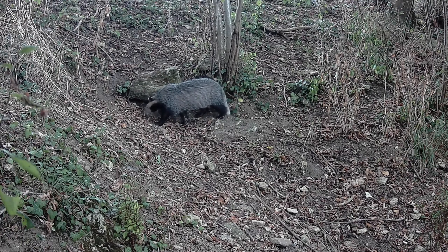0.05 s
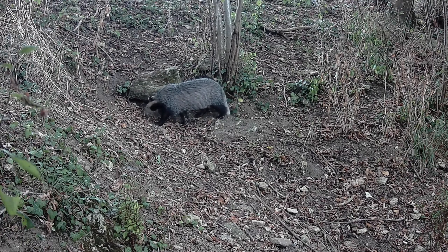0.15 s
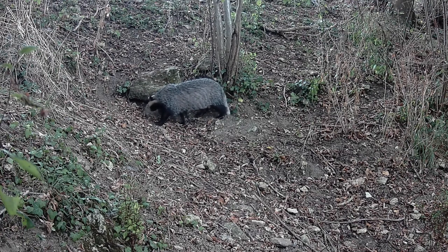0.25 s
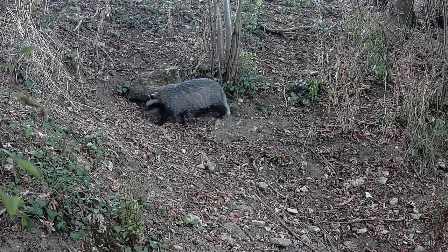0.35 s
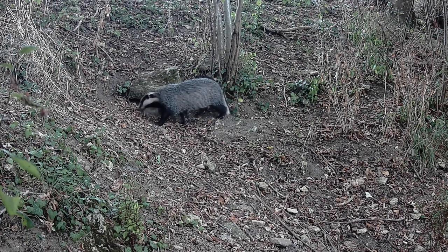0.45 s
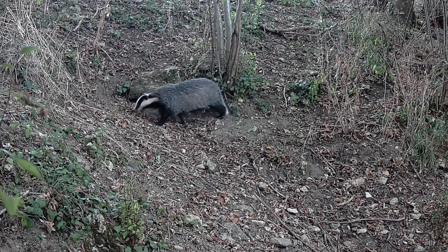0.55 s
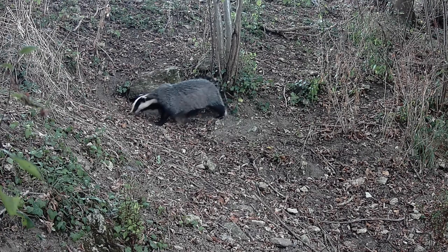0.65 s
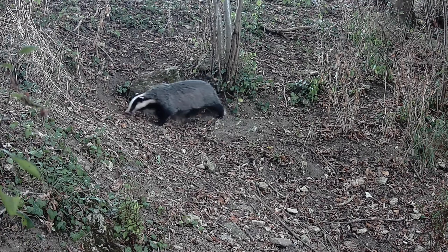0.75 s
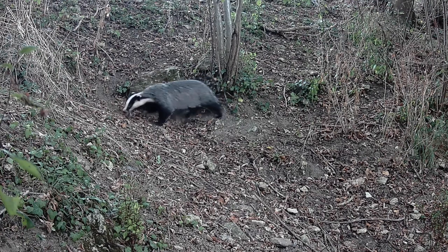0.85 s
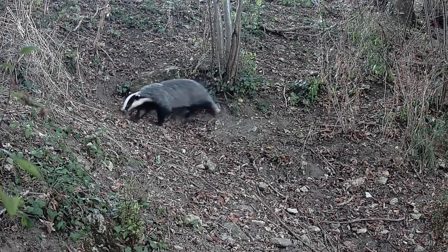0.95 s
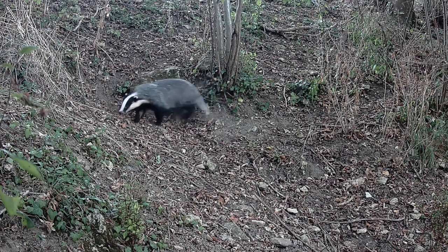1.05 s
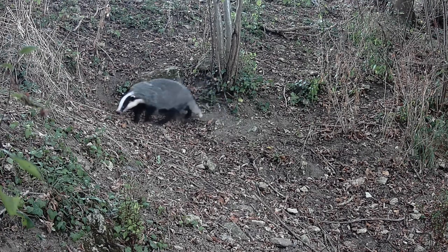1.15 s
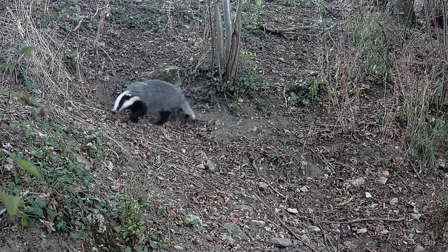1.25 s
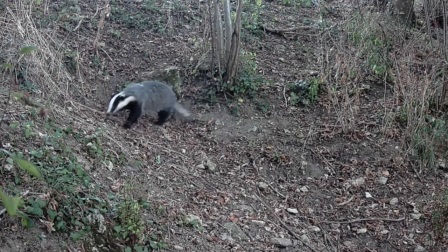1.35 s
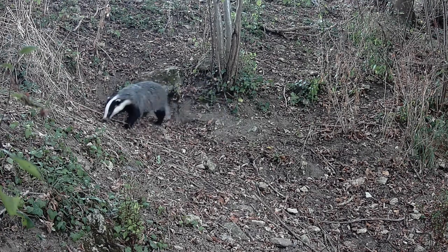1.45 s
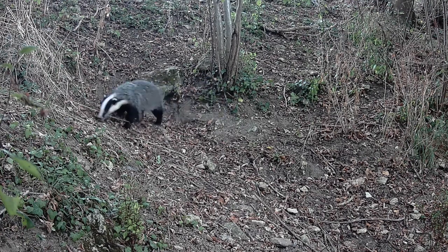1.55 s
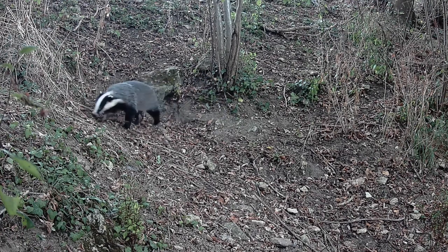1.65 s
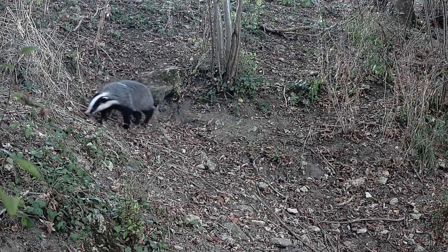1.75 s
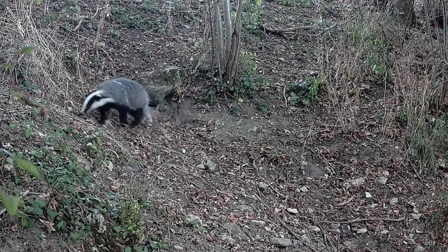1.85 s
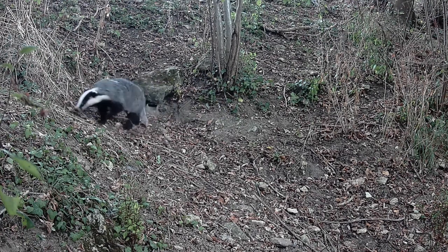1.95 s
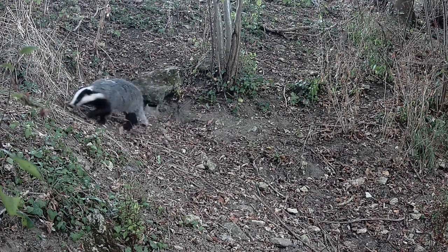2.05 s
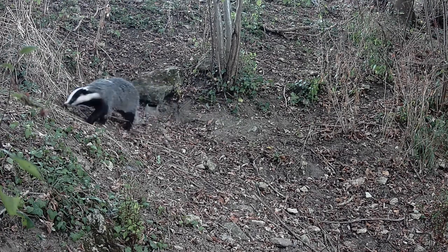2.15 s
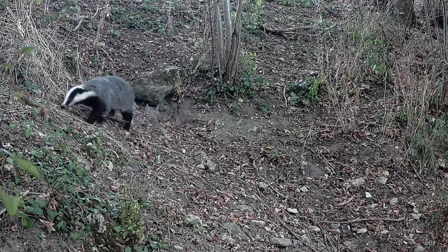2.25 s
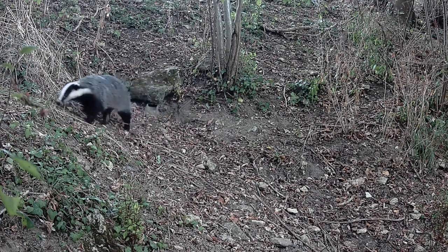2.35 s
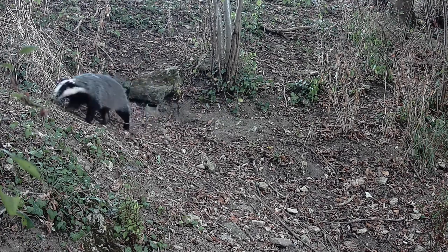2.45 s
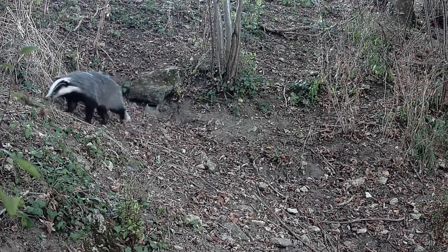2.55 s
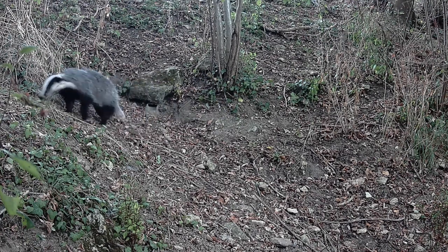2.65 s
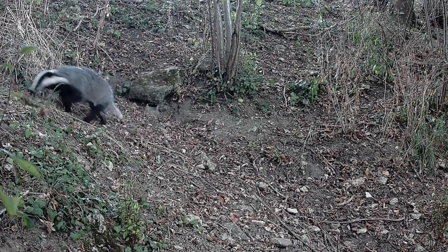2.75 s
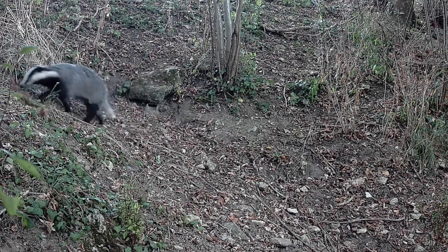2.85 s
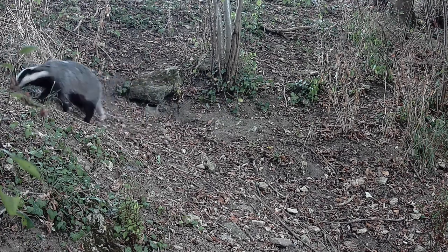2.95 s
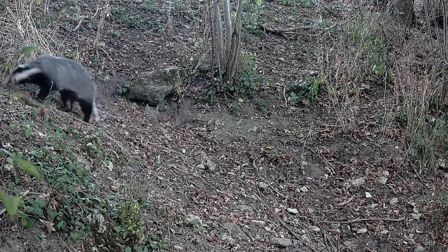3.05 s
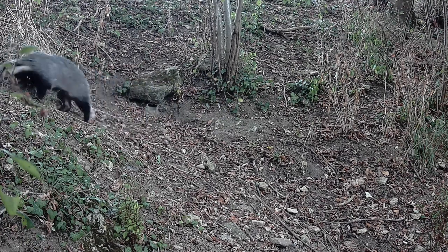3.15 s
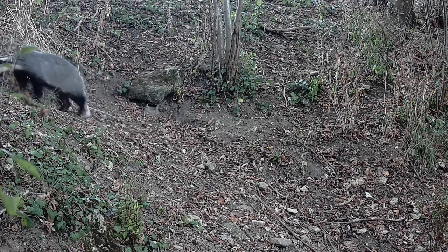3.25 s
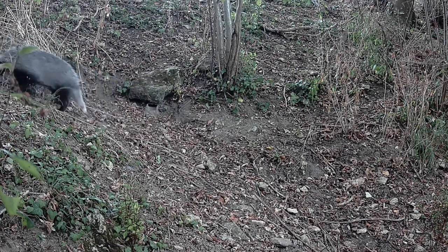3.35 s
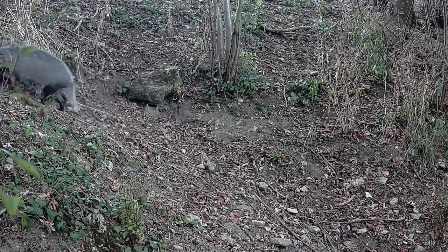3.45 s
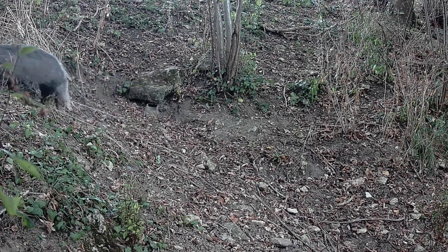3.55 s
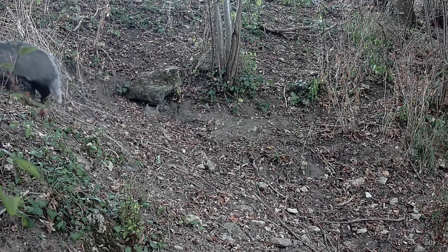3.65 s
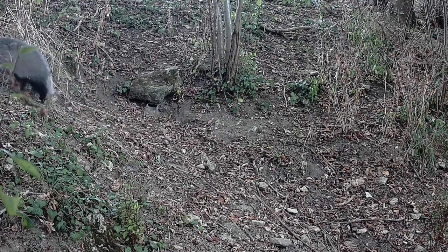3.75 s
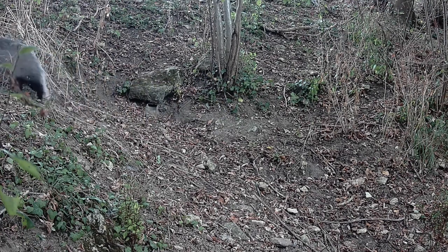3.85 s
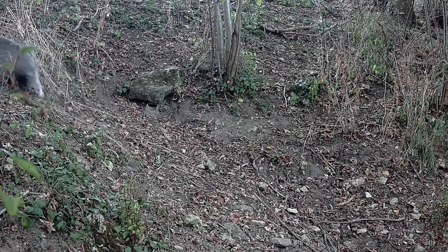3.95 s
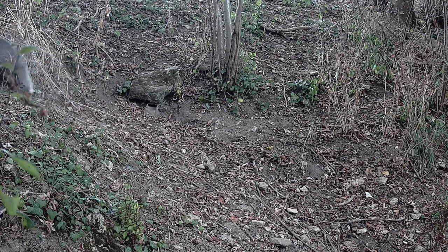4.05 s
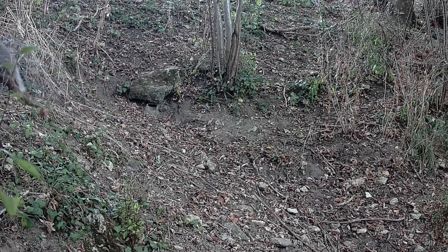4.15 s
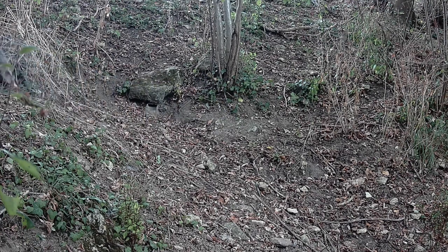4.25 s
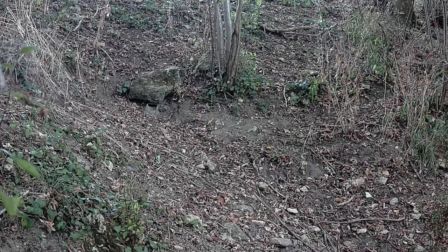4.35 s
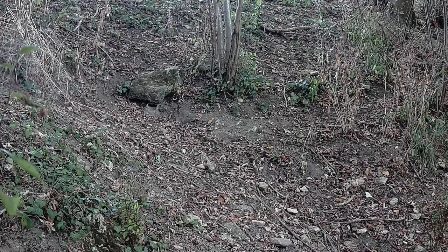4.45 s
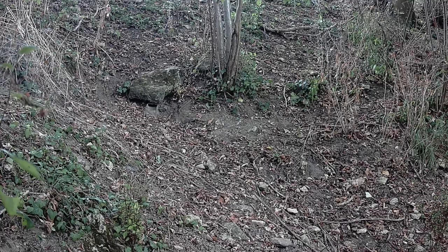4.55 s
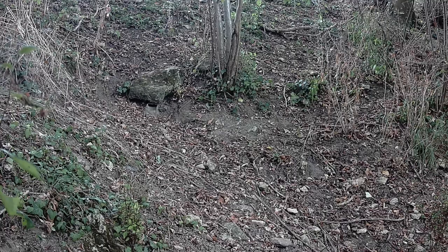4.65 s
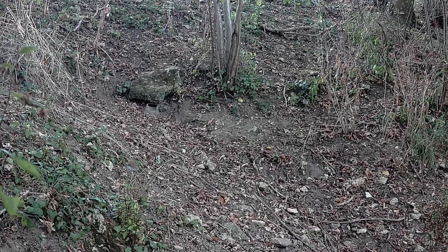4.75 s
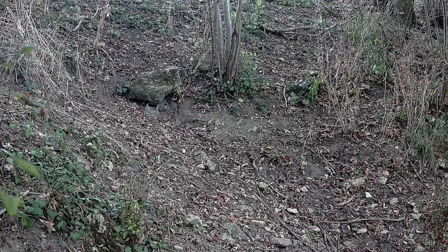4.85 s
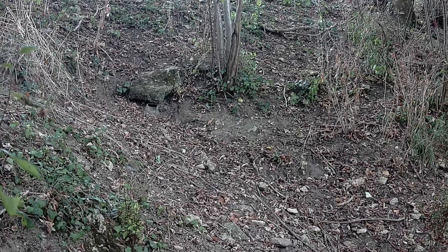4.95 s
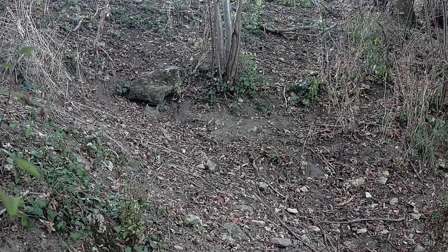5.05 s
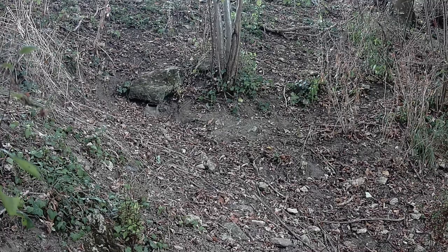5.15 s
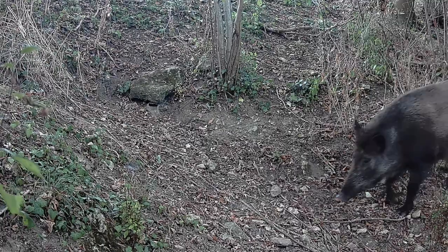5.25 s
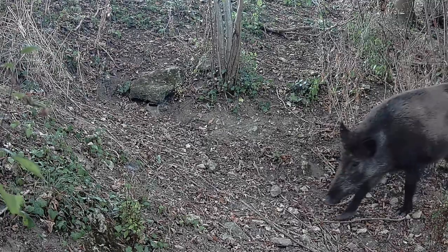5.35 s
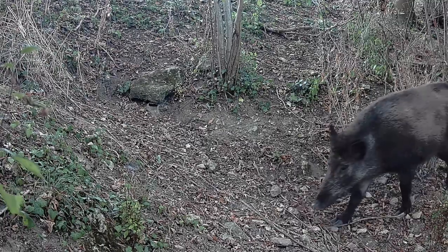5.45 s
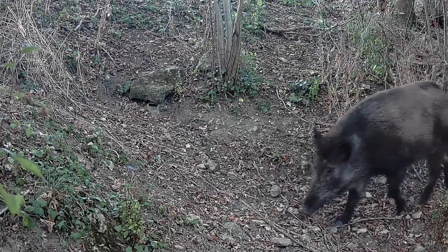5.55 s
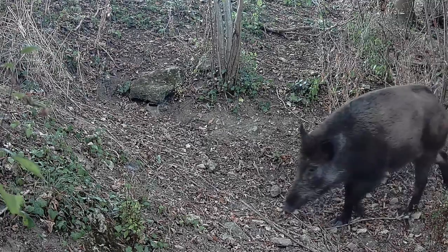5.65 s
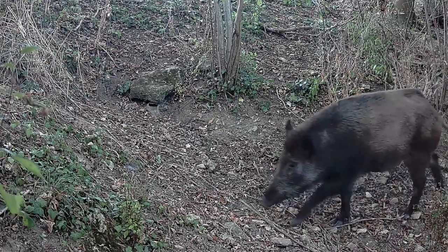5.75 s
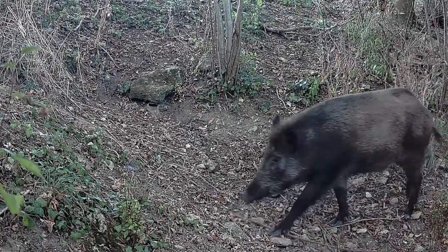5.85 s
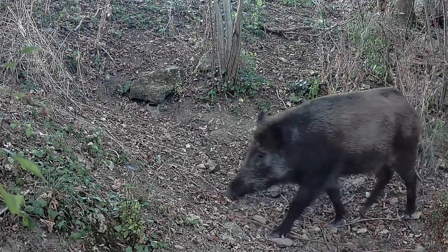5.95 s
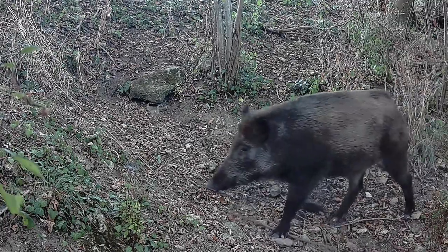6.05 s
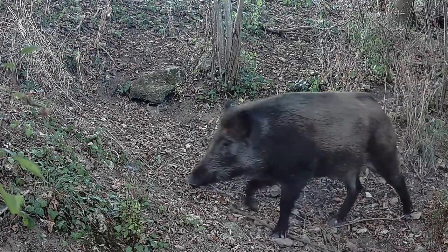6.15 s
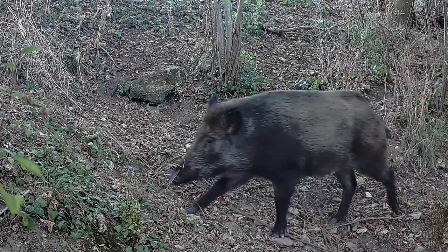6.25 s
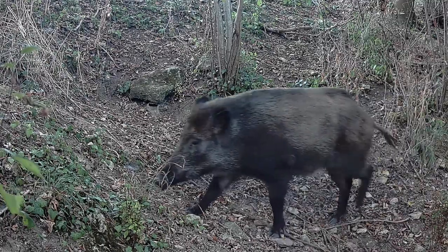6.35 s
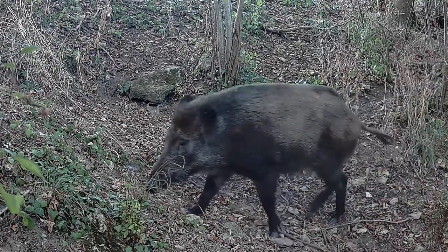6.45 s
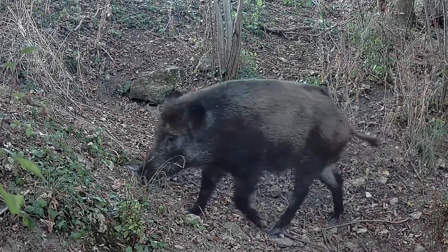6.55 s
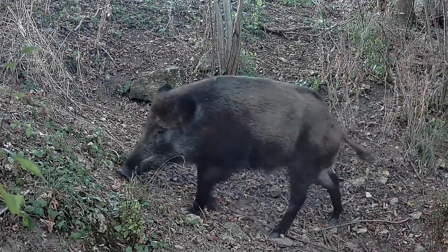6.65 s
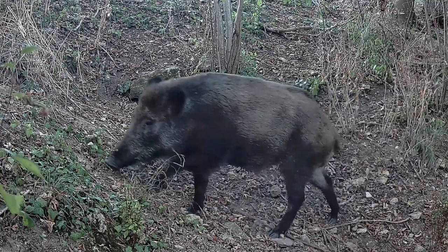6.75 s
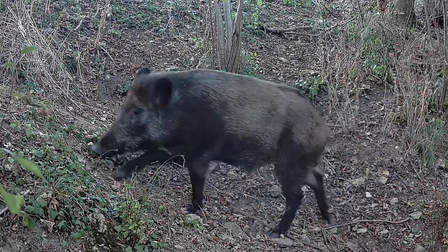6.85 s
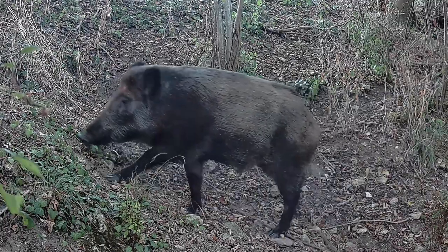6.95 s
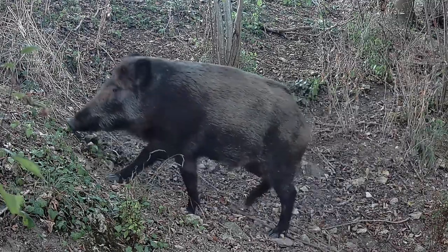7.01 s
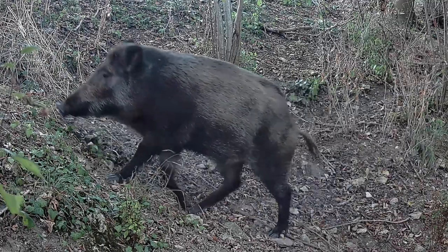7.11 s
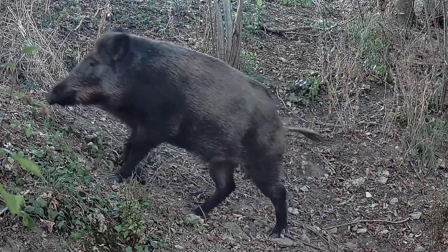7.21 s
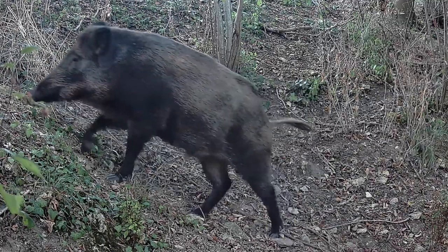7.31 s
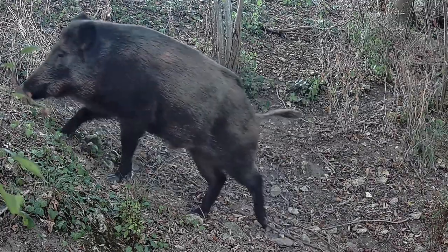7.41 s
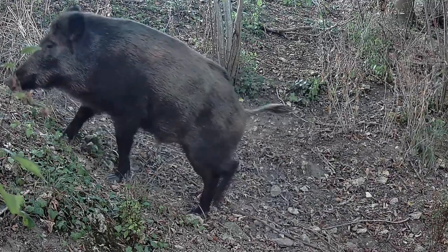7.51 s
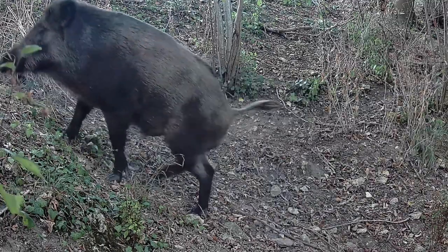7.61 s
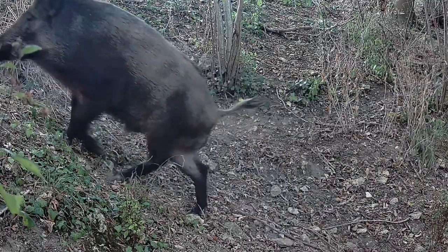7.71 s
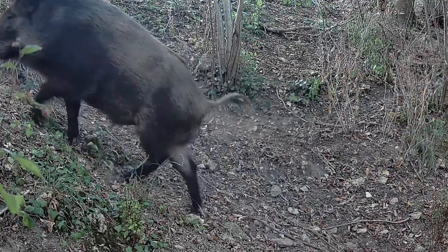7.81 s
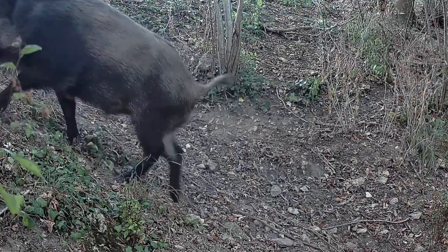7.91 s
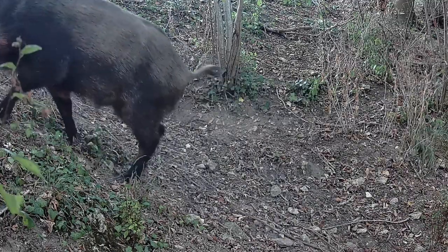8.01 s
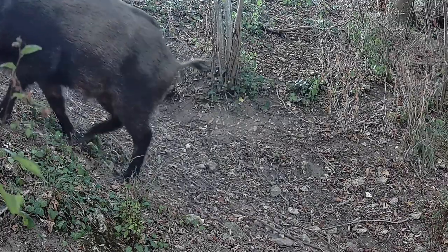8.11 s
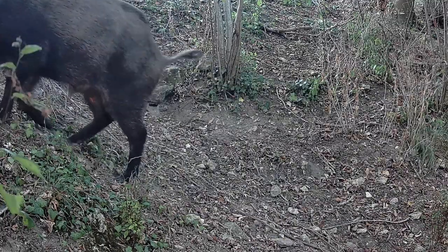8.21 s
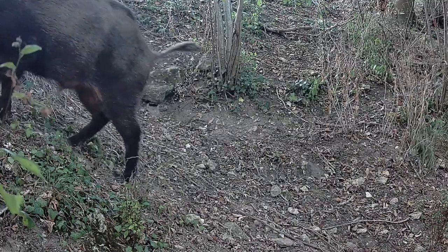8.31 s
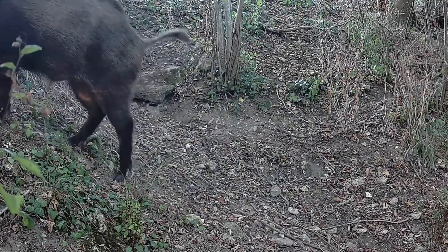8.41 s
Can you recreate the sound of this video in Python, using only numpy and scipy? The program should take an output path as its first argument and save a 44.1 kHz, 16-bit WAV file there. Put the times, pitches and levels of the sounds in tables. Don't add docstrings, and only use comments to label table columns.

```python
import sys
import numpy as np
from scipy import signal
from scipy.fft import rfft, irfft
from scipy.io import wavfile

SR = 44100
rng = np.random.default_rng(int(sys.argv[2]) if len(sys.argv) > 2 else 0)


def materialize(psi):
    bounded = np.clip(np.atleast_2d(psi).T, -1, 1)
    quanta = np.round(bounded * 32767).astype(np.int16)
    wavfile.write(sys.argv[1], SR, quanta)


def amplitude_ratio(level_db):
    exponent = np.asarray(level_db, float) / 20
    return 10 ** exponent


N = 373835

# (full weight [s], crisp leaf level [dB], twigs re leaf [dB], press [s], lift [s])
BADGER_STEPS = [(.383, -46.5, -3, 0.14, 0.071), (.547, -50.5, 0, 0.14, 0.27), (.872, -36, -7, 0.039, 0.14),
                (1.063, -25.5, -11, 0.0088, 0.018), (1.192, -41, -7, 0.16, 0.011),
                (1.244, -33, -2, 0.055, 0.12), (1.432, -39, -3, 0.014, 0.14),
                (1.478, -32, 1.5, 0.028, 0.031), (1.587, -36, -0.5, 0.037, 0.062),
                (1.791, -32, -0.5, 0.017, 0.1), (1.882, -34, -8.5, 0.14, 0.058),
                (2.008, -30.5, -3, 0.024, 0.084), (2.244, -28, -18, 0.014, 0.055),
                (2.375, -60, 9, 0.11, 0.14), (2.53, -48, -3, 0.13, 0.086), (2.682, -43, 2.5, 0.053, 0.047),
                (2.937, -35.5, -2, 0.0056, 0.084), (3.113, -46.5, 2, 0.067, 0.037),
                (3.42, -54.5, 6.5, 0.16, 0.16), (3.65, -58, 4.5, 0.064, 0.41),
                (4.015, -48.5, -11, 0.17, 0.21), (4.709, -51.5, -6, 0.18, 0.068),
                (4.839, -36.5, -4.5, 0.089, 0.068), (4.9, -57, -5, .05, 1)]
BOAR_STEPS = [(5.338, -38.5, -3.5, 0.043, 0.15), (5.748, -32, 8.5, 0.0062, 0.081),
              (5.762, -27.5, 4, 0.026, 0.018), (5.807, -39.5, 2, .08, 0.16),
              (5.94, -15.5, 1.5, 0.0072, 0.02), (5.981, -20.5, 1, 0.034, 0.15),
              (6.09, -24.5, 1.5, 0.038, 0.06), (6.14, -24, 4.5, 0.031, 0.093),
              (6.403, -27, -5, 0.019, 0.021), (6.473, -29, -2.5, 0.077, 0.1), (6.599, -38, -3, 0.082, 0.33),
              (6.747, -11, -8.5, 0.03, 0.017), (6.777, -20.5, 0.5, 0.054, 0.082),
              (6.868, -32.5, 3.5, 0.023, 0.047), (6.916, -31, 19.5, 0.0035, 0.027),
              (7.053, -34, -3.5, 0.33, 0.2), (7.861, -18.5, -1, 0.062, 0.074),
              (8.072, -32, 5.5, 0.02, 0.079), (8.195, -43, 5, 0.02, 0.086), (8.318, -34, 5, 0.011, 0.09),
              (8.368, -27.5, 5, 0.05, 0.078), (8.432, -19, -2, 0.11, 0.051)]
# (time [s], leaf level [dB], wood level [dB], wood pitch [Hz], leaf pitch [Hz])
BADGER_TICKS = [(0.5408, -29, -41, 3180, 7000), (0.9267, -31, -48, 2060, 6400),
                (1.185, -28, -61.0, 1830, 6900), (1.212, -47.0, -26.5, 2040, 5540),
                (1.2298, -37, -28.5, 1520, 5110), (1.2555, -25, -39, 3430, 6370),
                (1.2765, -23.5, -31.5, 3120, 5870), (1.4736, -31, -38, 2400, 6000),
                (1.4805, -21.5, -29.5, 1740, 5700), (1.6433, -39, -41, 1950, 6100),
                (1.6936, -32, -45, 1670, 6400), (1.7929, -19, -27.5, 2440, 6470),
                (1.8022, -30, -46.0, 2070, 5440), (1.8212, -19.5, -29, 1130, 6240),
                (2.021, -31, -30, 1100, 6000), (2.046, -49, -35, 1810, 5860),
                (2.2325, -24, -32, 2100, 5500), (2.24, -21, -45, 1930, 5340),
                (2.25, -18.5, -19, 2042, 5730), (2.6716, -27.5, -39, 3200, 6000),
                (2.6806, -29.5, -38, 3050, 5600), (2.694, -30.5, -24, 1684, 6140),
                (2.9396, -30.5, -31, 1470, 7050), (4.0145, -32.5, -39, 2590, 4270),
                (4.5081, -34.5, -41.5, 1830, 6240), (4.6999, -36, -44, 2880, 6990),
                (4.8027, -28.5, -27.5, 2370, 4500)]
BOAR_TICKS = [(5.4723, -28, -17, 2014, 6150), (5.628, -32, -63.0, 795, 5800),
              (5.7695, -38.0, -22.5, 1600, 6930), (5.795, -48, -21, 1600, 4880),
              (5.841, -30, -32, 1450, 6060), (5.8957, -33.5, -27.5, 3360, 5680),
              (5.9344, -15.5, -13.5, 2600, 5740), (5.941, -23, -20, 2640, 6500),
              (5.9994, -31, -21, 1810, 5600), (6.0104, -37.0, -29, 1350, 5050),
              (6.059, -23, -43.0, 2420, 5540), (6.1008, -23, -12, 1480, 4940),
              (6.259, -31, -44, 1160, 6740), (6.326, -45, -37, 1300, 5700),
              (6.3994, -31, -20.5, 2130, 6800), (6.488, -48.0, -18, 1130, 6150),
              (6.504, -30, -24.5, 1653, 5490), (6.735, -12, -24, 2050, 5800),
              (6.7685, -14, -13, 1860, 6260), (6.793, -12, -20, 1840, 5360),
              (6.841, -26, -42.0, 2200, 5990), (6.8629, -19.5, -35.0, 1740, 5100),
              (6.871, -48.0, -18, 1780, 5870), (7.961, -33, -36, 1590, 5960),
              (8.0033, -40.0, -59, 1950, 5960), (8.054, -47, -27.5, 1640, 6480),
              (8.2129, -47, -21, 1860, 4980), (8.382, -21, -20, 1390, 5530), (8.4468, -22, -22, 2160, 6700)]
BADGER_CRACKS = [(0.3025, -48, -41.5, 2360, 6750), (0.3707, -32.5, -44, 3550, 5600),
                 (0.3916, -33.5, -41, 2060, 6100), (0.8576, -32.5, -36.5, 2190, 5660),
                 (0.9013, -30.5, -43.0, 2250, 5730), (1.0623, -42, -47, 1930, 6440),
                 (1.173, -32.5, -54, 1620, 5130), (1.242, -24, -33, 2250, 6530),
                 (1.681, -47, -42.5, 2460, 5450), (3.0202, -45, -40, 1950, 5230),
                 (4.011, -38, -41, 2090, 4200), (4.624, -44, -37.5, 1760, 5600),
                 (4.843, -29, -39, 2100, 5800)]
BOAR_CRACKS = [(5.947, -15, -13.5, 1310, 5840), (6.111, -33, -19.5, 2130, 5750),
               (6.119, -47.0, -23, 2020, 5440), (6.471, -42.0, -17.5, 1650, 6220),
               (6.602, -30.5, -30, 1110, 7060), (6.682, -48.0, -31.5, 1260, 6430),
               (6.7505, -23, -15.5, 1750, 5490), (6.9187, -53, -11, 1330, 4010),
               (7.877, -35.5, -32.0, 1860, 6460), (8.0356, -53, -34, 1195, 5620),
               (8.1014, -45.0, -31, 965, 6050), (8.224, -42, -27, 1354, 5060),
               (8.328, -30, -32, 2140, 4430), (8.43, -20, -20.5, 2260, 4640)]
CRUNCHES = [(0.877, -35, -38, 2420, 6600), (1.5646, -33.5, -46, 1080, 6560), (1.594, -41, -44, 3400, 6300),
            (1.8803, -36, -39, 3400, 5330), (2.012, -28, -30.5, 2240, 6600),
            (2.3737, -37.5, -35.5, 2130, 4830), (2.472, -40.5, -41.5, 1620, 5430),
            (2.9815, -34.5, -44, 1850, 6140), (3.5, -57, -64, 3560, 4150), (3.8343, -43, -38.5, 2600, 5860),
            (4.3213, -35.5, -42, 1900, 5800), (4.7107, -41.5, -56, 2220, 5200),
            (5.333, -34.5, -28, 2015, 5250), (5.3443, -38.5, -29.5, 1470, 5180),
            (5.758, -21.5, -21.5, 1213, 6160), (5.8077, -32.5, -28.5, 1594, 5130),
            (6.141, -17, -22.5, 1935, 5600), (6.8266, -34, -29, 1800, 5230),
            (7.015, -33.5, -27, 1993, 5940), (7.0487, -54.0, -33, 1850, 7010),
            (7.0901, -35, -46, 1798, 5850), (8.069, -25, -32.5, 3210, 5570), (8.19, -42, -25.5, 1620, 5890)]
# (time [s], peak [dB], pitch [Hz])
BADGER_PRICKS = [(0.3505, -43, 2210), (0.3828, -35, 2110), (0.3878, -33, 4870), (0.4847, -51, 6580),
                 (0.6084, -38, 7200), (0.6089, -43.5, 5220), (1.0026, -47, 5890), (1.0719, -31, 2090),
                 (1.1491, -36, 5430), (1.1921, -32, 6050), (1.224, -23, 6420), (1.2705, -29, 4600),
                 (1.1775, -35, 6800), (1.2851, -32, 2200), (1.3667, -36, 4120), (1.3675, -37, 6270),
                 (1.6132, -35, 6180), (1.6551, -42, 4920), (1.6551, -44, 6210), (1.6553, -42, 2060),
                 (1.8161, -28, 1870), (1.8162, -29, 1930), (1.8563, -41, 1710), (1.8565, -43, 1940),
                 (1.8877, -31, 5290), (2.0151, -31, 1890), (2.0158, -23, 2130), (2.0553, -34, 1560),
                 (2.078, -31, 5300), (2.0848, -44, 5440), (2.1305, -40, 5630), (2.1309, -44, 5920),
                 (2.184, -52, 5080), (2.1898, -38, 5890), (2.3398, -42, 6130), (2.4073, -39, 6130),
                 (2.4783, -35, 2720), (2.5275, -32, 5350),
                 (2.7166, -39, 5520), (2.943, -28, 2230), (3.0263, -44, 4840), (3.0367, -37, 5120),
              (3.1078, -33, 2550), (3.1115, -29, 5510), (3.1193, -34, 5570), (3.1195, -42, 5820),
              (3.3192, -44, 1740), (3.3706, -38, 2220), (3.5039, -32, 4120), (3.5383, -38, 1340),
              (3.6642, -38, 6290), (3.913, -42, 5180), (3.9144, -36.5, 2050), (3.9593, -44, 2350),
              (3.9973, -51, 1340), (4.0239, -38, 5880), (4.0694, -49, 2340), (4.111, -51, 6540),
              (4.1172, -50, 4960), (4.1704, -39.5, 2590), (4.2137, -49, 5370), (4.2349, -36, 5170),
              (4.2363, -42, 3900), (4.346, -32, 5710), (4.444, -36, 5930), (4.617, -47, 5170),
              (4.62, -34, 2210), (4.6497, -40, 6290), (4.685, -35, 2780), (4.7159, -43, 5160),
              (4.8392, -36, 2040), (5.1444, -49, 5600)]
BOAR_PRICKS = [(5.3071, -36, 6090), (5.3934, -37, 2110), (5.4552, -41, 6990), (5.4907, -43, 5480),
               (5.6854, -37, 1320), (5.7622, -24, 1360), (5.8113, -26, 4730), (5.812, -24, 1910),
               (6.085, -17, 6030), (6.0883, -35, 1620), (6.0908, -18, 5010), (6.2445, -47, 1510),
               (6.2678, -45, 1520), (6.3175, -29, 6640), (6.342, -49, 5220), (6.4067, -20, 1160),
               (6.4101, -36, 6580), (6.4595, -35, 5380), (6.4594, -19, 6400), (6.5618, -45, 2110),
               (6.598, -30, 5430), (6.6436, -26, 4710), (6.7445, -5.5, 5000), (6.9239, -35.5, 6300),
               (6.9243, -9, 2230), (6.928, -37, 4210), (6.9699, -43, 5210), (7.0591, -29.5, 5620),
               (7.9941, -39, 1650), (8.1094, -26, 7800), (8.1685, -41, 1720), (8.1692, -41, 2070),
               (8.1944, -26, 5940), (8.1992, -20.5, 1970), (8.2766, -46, 5560), (8.2923, -43, 6440),
               (8.3195, -29, 1530), (8.376, -14, 5400)]
# (time [s], peak [dB])
BARE_CLICKS = [
    (5.934, -9),
    (5.946, -5.5),
    (6.4705, -20),
    (6.7341, -1),
    (6.7351, -3),
    (6.7906, -5.5),
    (8.3822, -12),
    (8.4302, -10),
    (8.4484, -11),
]
# (time [s], peak [dB], soil pitch [Hz])
FOOT_THUMPS = [(1.778, -35, 840), (5.336, -28.5, 1030), (6.398, -31.5, 810), (6.467, -25, 730),
               (5.47, -33.5, 304), (5.76, -28, 420), (5.79, -31.5, 613), (6.014, -25, 553),
               (6.021, -26.5, 467), (6.048, -42, 547), (6.72, -31.5, 220), (6.022, -34.5, 203),
               (6.11, -38.5, 500), (6.397, -33, 385), (6.478, -33, 322), (6.787, -33, 480),
               (6.916, -22.5, 663), (8.09, -35.5, 290), (8.195, -38, 620), (2.284, -45, 540),
               (2.02, -44.5, 560), (8.331, -31, 736), (8.373, -33, 330), (8.42, -28, 746)]
# (loudest [s], level [dB], throat [Hz], length [s], snout [Hz])
GRUNTS = [
    (5.547, -43.5, 340, 0.13, 2100),
    (6.637, -41.5, 430, 0.17, 1120),
    (7.06, -47.5, 222, 0.059, 1100),
]
# (time [s], 2nd order level [dB], 3rd order level [dB])
ENGINE_ORDERS = [
    (0, -55, -51.5),
    (.9, -52.5, -60.5),
    (1.5, -54, -63),
    (2.1, -54.5, -67),
    (2.4, -55, -54.5),
    (3.3, -58.5, -59),
    (3.6, -61, -54),
    (4.2, -65, -56),
    (5.295, -65, -55.5),
]
# (time [s], level [dB])
STIR = [(0, -12), (.5, -6.5), (1.4, -2), (2.1, -1), (2.5, 4), (2.85, -2), (3.27, -3), (3.45, 6), (4.1, 1),
        (4.6, 0), (5.27, -5.5), (5.3, -0.5), (6.3, 6), (6.6, 0), (7.9, 7.5), (8.27, -1.5), (8.47, -14)]
# (frequency [Hz], gain [dB])
LEAF_COLOUR = [(200, -21), (700, -11), (1150, -1.5), (2250, -4), (2800, -11.5), (3400, -7), (3850, -12.5),
               (4550, -9.5), (5000, -2), (7000, -0.5), (7900, -11.5), (9700, -18.5), (11000, -40),
               (11600, -86)]
# (frequency [Hz], gain [dB])
AIR_COLOUR = [(150, 2.5), (400, -5), (1000, -9), (2200, -16.5), (2800, -23), (3300, -28), (3850, -31.5),
              (4550, -31), (5000, -26), (7000, -28), (7900, -35), (9700, -44.5), (10800, -62)]
# (time [s], height [dB])
SAMPLE_CLICKS = [
    (.889, -50),
    (.896, -54),
    (5.528, -46),
    (5.9468, -23),
]

SCENE_CHANGE_S = 5.297
REPEAT_LAG, REPEAT_S = 80600, .748
DIP_HZ, FAR_HZ = 3900, 14000
# (rumble [dB], air [dB], far rustle [dB]), and the share of the stir each follows
BADGER_REST_DB, BOAR_REST_DB, STIR_SHARE = (-53, -55, -59.5), (-49, -55.5, -53), (.2, 0.4, 0.75)


def rms_one(x):
    return x / np.sqrt(np.mean(x ** 2) + 1e-20)


def noise():
    return rng.standard_normal(N)


def colour(x, spectrum):
    size = 4096
    hz, db = np.transpose(spectrum)
    bins_hz = np.arange(size // 2 + 1) * SR / size
    log_gain = np.interp(np.log(bins_hz + 1), np.log(hz), db) * np.log(10) / 20
    fold = irfft(log_gain)
    fold[1:size // 2] *= 2
    fold[size // 2 + 1:] = 0
    return signal.oaconvolve(x, irfft(np.exp(rfft(fold))))[:N]


def band(x, low_hz, high_hz, order=2):
    return signal.sosfilt(signal.butter(order, [low_hz, high_hz], "band", fs=SR, output="sos"), x)


def drift(rate):
    r = np.exp(-40 * np.pi * rate / SR)
    coarse = rng.standard_normal(N // 20 + 2002)
    slow = signal.lfilter([1], [1, -2 * r, r * r], coarse)[2000:]
    return np.interp(np.arange(N) / 20, np.arange(len(slow)), rms_one(slow))


def ring(x, hz, t60):
    r, w = amplitude_ratio(-60 / (t60 * SR)), 2 * np.pi * hz / SR
    return signal.lfilter([0, np.sin(w)], [1, -2 * r * np.cos(w), r * r], x + 1e-18)


def uneven(spread_db):
    return amplitude_ratio(spread_db * np.minimum(rng.exponential(size=N), 4)) * rng.choice([-1, 1], N)


def cracks(per_s, spread_db, cycles, low_hz, high_hz, clump_db, patch_db, count=16):
    sizes = uneven(spread_db)
    born = rng.random(N) < per_s * amplitude_ratio(clump_db * drift(40)) / SR
    dealt = rng.integers(count, size=N)
    rings = 0
    for k, hz in enumerate(np.geomspace(low_hz, high_hz, count)):
        patches = amplitude_ratio(patch_db * drift(13.8))
        ringing = rms_one(ring(sizes * born * (dealt == k), hz, cycles / hz))
        rings = rings + np.sqrt(hz) * patches * ringing
    return rms_one(band(colour(rings, LEAF_COLOUR), low_hz, high_hz, order=4))


def swell_db(s, press_s, lift_s, swing_db):
    t = np.arange(N) / SR - s
    pressing = -t / max(press_s, .002)
    lifting = (np.abs(t) / max(lift_s, .002)) ** 0.96
    return -swing_db * np.where(t < 0, pressing, lifting)


def steps():
    leaf_power, twig_power = np.zeros(N), np.zeros(N)
    for s, leaf_db, twig_db, press_s, lift_s in BADGER_STEPS + BOAR_STEPS:
        weight = amplitude_ratio(2 * (leaf_db + swell_db(s, press_s, lift_s, swing_db=25)))
        leaf_power += weight
        twig_power += weight * amplitude_ratio(2 * twig_db)
    leaves = cracks(11000, 2.3, 14, DIP_HZ, FAR_HZ, clump_db=2.8, patch_db=3.3)
    twigs = cracks(6500, 2.2, 16, 850, DIP_HZ, clump_db=2.5, patch_db=3.5)
    boar = np.arange(N) / SR > SCENE_CHANGE_S
    twigs = np.where(boar, twigs, band(twigs, 1270, 8700))
    soil = boar * cracks(900, 1.9, 2.2, 109, 734, clump_db=3.5, patch_db=4.5, count=8)
    clicks = uneven(3.5) * (rng.random(N) < 260 / SR)
    whole = rms_one(band(colour(clicks, LEAF_COLOUR), 1500, FAR_HZ))
    leaves = .8 * leaves + amplitude_ratio(-4.5) * whole
    body = twigs + amplitude_ratio(-11) * soil
    return amplitude_ratio(-2) * (np.sqrt(leaf_power) * leaves + np.sqrt(twig_power) * body)


def snaps():
    lead, length = round(.015 * SR), round(.06 * SR)
    t = (np.arange(length) - lead) / SR
    litter = colour(noise(), LEAF_COLOUR)
    bright = rms_one(band(litter, DIP_HZ, FAR_HZ, order=4))
    dull = rms_one(band(litter, 836, DIP_HZ, order=4))
    out = np.zeros(N + length)
    kinds = [(BADGER_TICKS + BOAR_TICKS, 0.74, 3.5),      # (table, rise ms, length ms)
             (BADGER_CRACKS + BOAR_CRACKS, 1.94, 7.6),
             (CRUNCHES, 4, 16.2)]
    rows = [(*row, rise_ms, ms) for table, rise_ms, ms in kinds for row in table]
    for s, leaf_db, wood_db, wood_hz, leaf_hz, rise_ms, ms in rows:
        at = round(s * SR) - lead
        rise = np.exp(-(t * 1000 / rise_ms) ** 2)
        fall = np.exp(-(np.abs(t) / (0.4 * ms / 1000)) ** 0.76)
        swell = np.where(t < 0, rise, fall)
        leaf = np.resize(bright[at:at + length], length)
        leaf = swell * (leaf + rms_one(ring(leaf, leaf_hz, 24 / leaf_hz)))
        stick = np.resize(dull[at:at + length], length)
        stick = band(stick, 0.6 * wood_hz, min(1.6 * wood_hz, 3800))
        knock = ring(ring(stick, wood_hz, 50 / wood_hz), wood_hz, 5 / wood_hz)
        stick = swell * (0.17 * stick + rms_one(knock))
        even = np.linalg.norm(swell)
        out[at:at + length] += even * amplitude_ratio(leaf_db) * leaf / np.linalg.norm(leaf)
        out[at:at + length] += even * amplitude_ratio(wood_db) * stick / np.linalg.norm(stick)
    return out[:N]


def pricks():
    lead, length = round(.004 * SR), round(.03 * SR)
    t, out = (np.arange(length) - lead) / SR, np.zeros(N + length)
    for s, peak_db, hz in BADGER_PRICKS + BOAR_PRICKS:
        burst = rng.standard_normal(length) * np.exp(-(t * 1000 / 0.45 + 0.55) ** 2)
        stalk = rms_one(ring(burst, hz, 54 / hz))
        rasp = rms_one(band(colour(burst, LEAF_COLOUR)[:length], .55 * hz, min(1.5 * hz, 8000)))
        prick = stalk + .5 * rasp
        at = round(s * SR) - lead
        out[at:at + length] += amplitude_ratio(peak_db - 0.5) * prick / np.abs(prick).max()
    return out[:N]


def bare_clicks():
    clicks = np.zeros(N)
    for s, peak_db in BARE_CLICKS:
        clicks[round(s * SR)] = amplitude_ratio(peak_db)
    one_click = colour(signal.unit_impulse(N), LEAF_COLOUR)
    return colour(clicks, LEAF_COLOUR) / np.abs(one_click).max()


def foot_thumps():
    length = round(.12 * SR)
    out, t = np.zeros(N + length), np.arange(length) / SR
    for s, peak_db, soil_hz in FOOT_THUMPS:
        push = rng.standard_normal(length) * (1 - np.exp(-t / 0.00042)) * amplitude_ratio(-60 * t / 0.067)
        thud = band(ring(push, soil_hz, 12 / soil_hz), 145, 2150)
        at = round(s * SR)
        out[at:at + length] += amplitude_ratio(peak_db + 4.5) * thud / np.abs(thud).max()
    return out[:N]


def grunts():
    swing_db, sag_hz_per_s, narrowing = 18, 300, 0.32
    t = np.arange(N) / SR
    level, throat_hz, snout = np.zeros(N), np.zeros(N), np.zeros(N)
    for s, db, hz, length, snout_hz in GRUNTS:
        place = (t - s) / (length / 2)
        shape = amplitude_ratio(db - swing_db * np.abs(place) ** 3)
        throat = np.maximum(hz * (1 - narrowing * place ** 2) - sag_hz_per_s * (t - s), 50)
        throat_hz = np.where(shape > level, throat, throat_hz)
        level = np.maximum(level, shape)
        snout += shape * rms_one(ring(noise(), snout_hz, 24 / snout_hz))
    throat_hz = np.maximum(throat_hz, 50)
    pulse_hz = 45 * amplitude_ratio(2.3 * drift(29.77))
    pulses = np.diff(np.floor(np.cumsum(pulse_hz) / SR), prepend=0)
    source = rms_one(pulses) + 2.6 * noise()
    voice = 0
    for hz in np.geomspace(140, 650, 12):
        nearness = np.exp(-(np.log(throat_hz / hz) / 0.58) ** 2)
        voice = voice + rms_one(ring(source, hz, 0.03)) * nearness
    effort = amplitude_ratio(swing_db * np.log10(level / level.max() + 1e-3))
    chest = 1.4 * effort * rms_one(band(source, 477, 687))
    breath = 0.27 * rms_one(band(source, 1100, 1900))
    return amplitude_ratio(-7) * snout + amplitude_ratio(-0.5) * level * (band(voice, 174, 830) + chest + breath)


def trees(x):
    t = np.arange(round(.2 * SR)) / SR
    scatter = rng.standard_normal(len(t)) * amplitude_ratio(-60 * t / 0.083) * (t > .004)
    return signal.fftconvolve(x, scatter / np.linalg.norm(scatter))[:N]


def engine_drone():
    start_hz, gain_hz_per_s, ease_hz_per_s2 = 60.3, 2.3, .11
    s, second_db, third_db = np.transpose(ENGINE_ORDERS)
    t = np.arange(N) / SR
    turn = 2 * np.pi * (start_hz * t + gain_hz_per_s * t ** 2 / 2 - ease_hz_per_s2 * t ** 3 / 3)
    drone = 0
    for order, db in [(2, second_db), (3, third_db)]:
        level = amplitude_ratio(np.interp(t, s, db, right=-120) + drift(1.8))
        drone = drone + np.sqrt(2) * level * np.sin(order * turn)
    return drone


def wood():
    t = np.arange(N) / SR
    later = t > SCENE_CHANGE_S
    stir_db = np.interp(t, *np.transpose(STIR))
    rumble_db, air_db, rustle_db = (np.where(later, after, before) + share * stir_db for before, after, share
                                    in zip(BADGER_REST_DB, BOAR_REST_DB, STIR_SHARE))
    road = rms_one(band(noise(), 60, 120))
    hollow = rms_one(ring(band(noise(), 42, 80), 59, 0.1)) * amplitude_ratio(2.4 * drift(5))
    slope = rms_one(band(road, 76, 190))
    rumble = 0.5 * road + hollow + later * (0.49 * slope - 0.32 * hollow)
    air = rms_one(band(colour(noise(), AIR_COLOUR), 130, DIP_HZ, order=4)) * amplitude_ratio(drift(8))
    rustle = rms_one(band(colour(noise(), AIR_COLOUR), DIP_HZ, FAR_HZ, order=4)) * amplitude_ratio(1.2 * drift(5))
    ticks = cracks(700, 3, 30, 1300, 6500, clump_db=5, patch_db=5)
    brush = later * rms_one(band(colour(noise(), LEAF_COLOUR), 1100, 2650)) * amplitude_ratio(13 * drift(2))
    rustling = rustle + amplitude_ratio(-1) * ticks + amplitude_ratio(-2) * brush
    return amplitude_ratio(rumble_db + 2.5) * rumble + amplitude_ratio(air_db + 4) * air + amplitude_ratio(rustle_db) * rustling


def scene():
    feet = steps() + snaps() + pricks() + bare_clicks() + foot_thumps()
    return (feet + amplitude_ratio(-15) * trees(feet) + grunts() + engine_drone() + wood())[None]


def top_cut(x):
    return signal.sosfilt(signal.butter(12, 16840, fs=SR, output="sos"), x)


def record(dry):
    x = signal.sosfilt(signal.ellip(10, .5, 70, 11150, fs=SR, output="sos"), dry)
    x = signal.lfilter(*signal.iirnotch(8000, 45, fs=SR), x)
    for s, db in SAMPLE_CLICKS:
        x = x + amplitude_ratio(db) * signal.unit_impulse(N, round(s * SR))
    since = np.arange(N) / SR - (SCENE_CHANGE_S + REPEAT_LAG / SR)
    again = np.clip(np.minimum(since, REPEAT_S - since) / .02, 0, 1)
    x = x * (1 - again) + again * np.roll(x, REPEAT_LAG, axis=1)
    overloaded = np.clip(x, -.72, .72)
    mix = signal.sosfilt(signal.ellip(8, .5, 60, 16700, fs=SR, output="sos"), overloaded)
    return top_cut(mix)


dry = scene()
out = record(dry)
materialize(out)
```